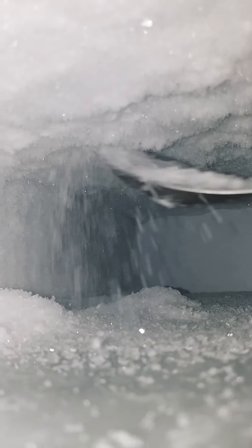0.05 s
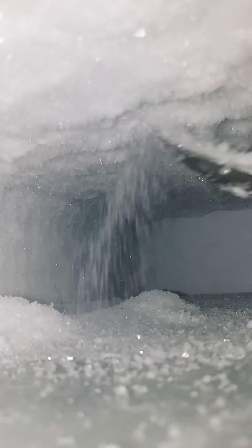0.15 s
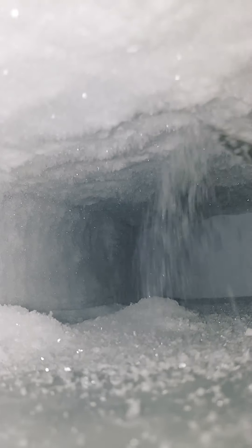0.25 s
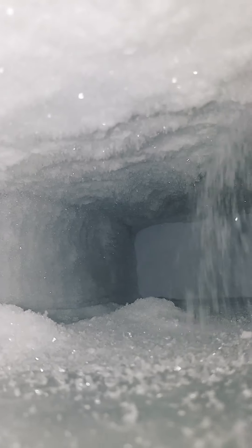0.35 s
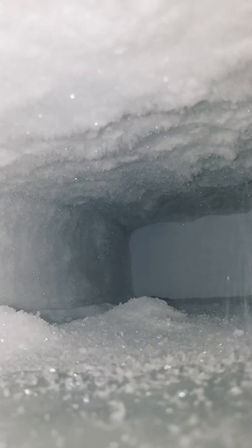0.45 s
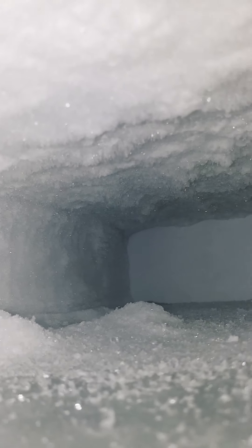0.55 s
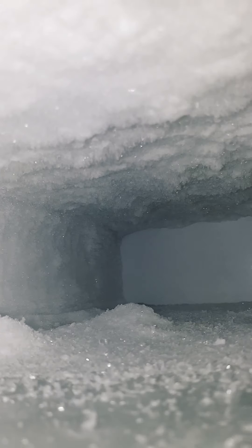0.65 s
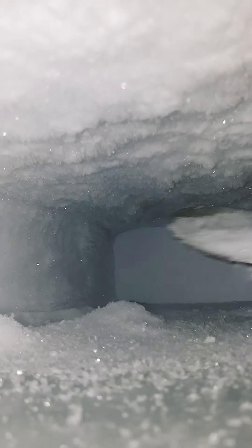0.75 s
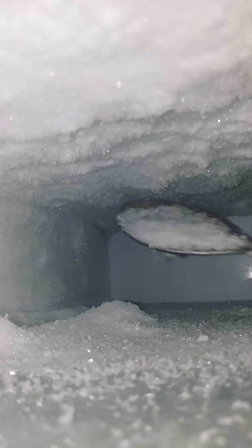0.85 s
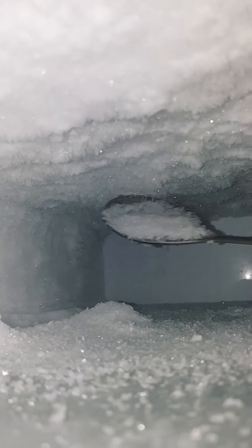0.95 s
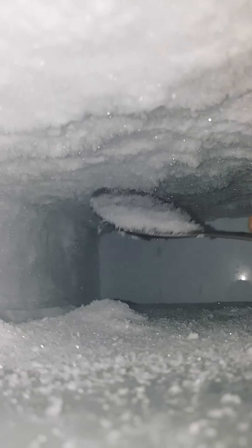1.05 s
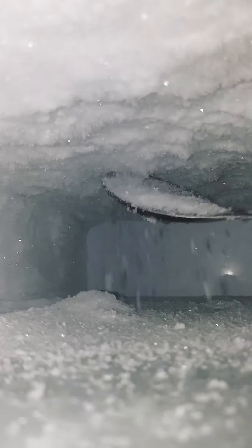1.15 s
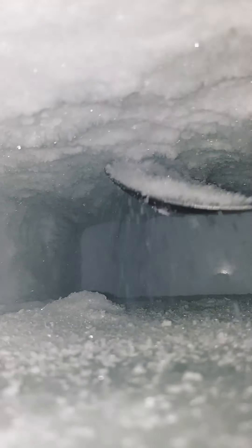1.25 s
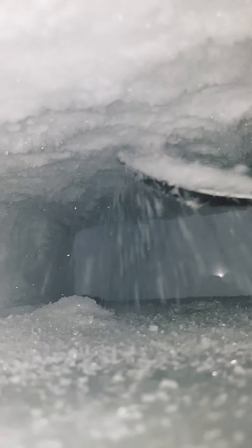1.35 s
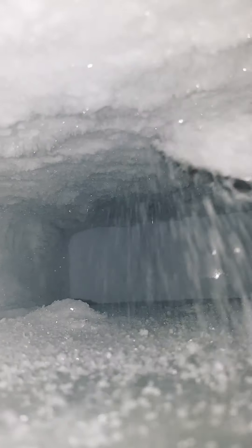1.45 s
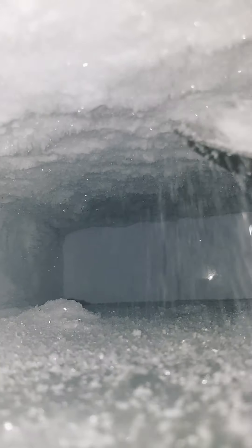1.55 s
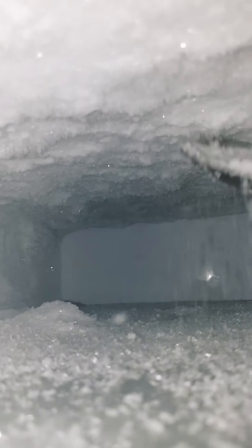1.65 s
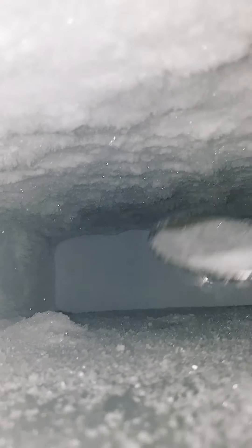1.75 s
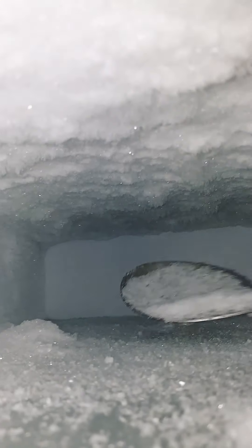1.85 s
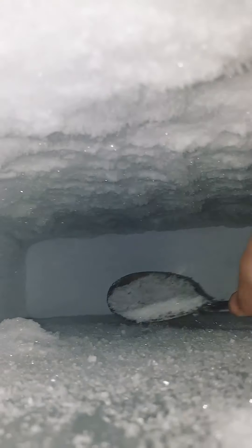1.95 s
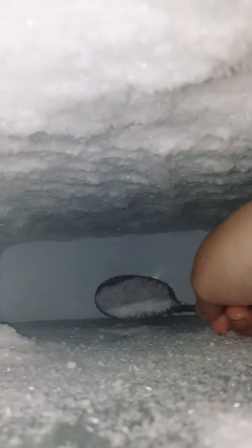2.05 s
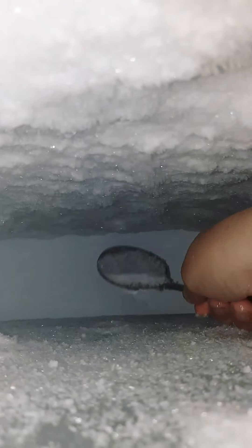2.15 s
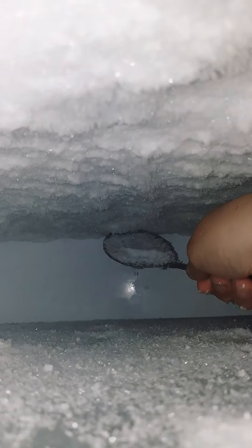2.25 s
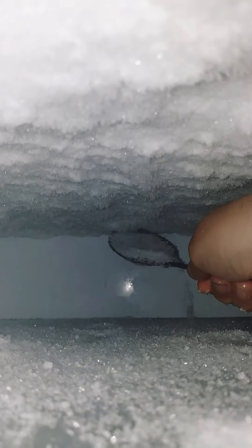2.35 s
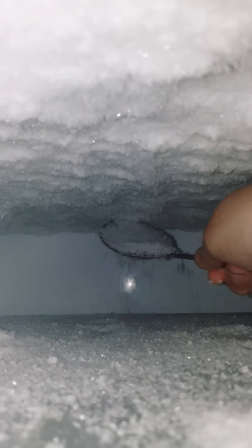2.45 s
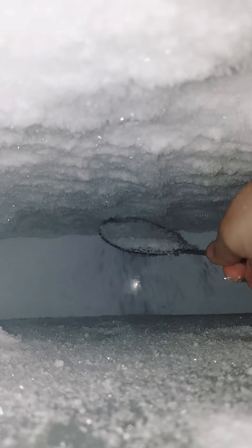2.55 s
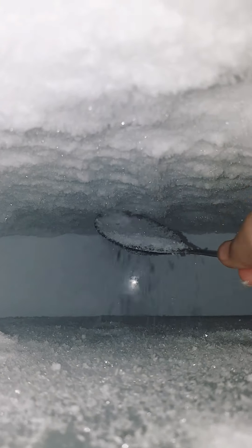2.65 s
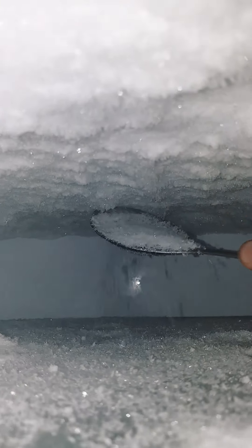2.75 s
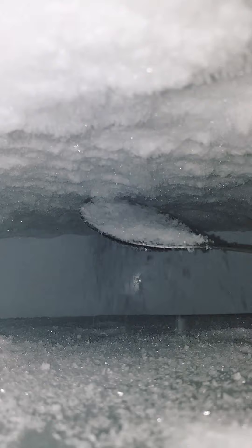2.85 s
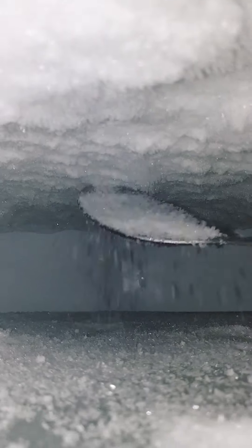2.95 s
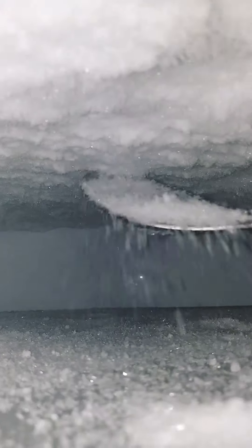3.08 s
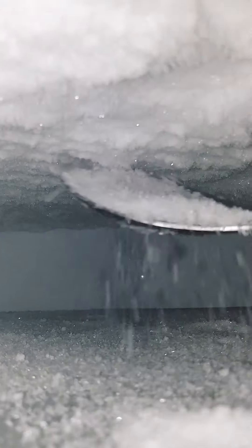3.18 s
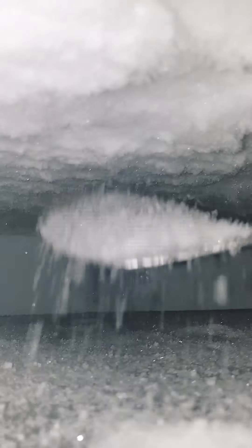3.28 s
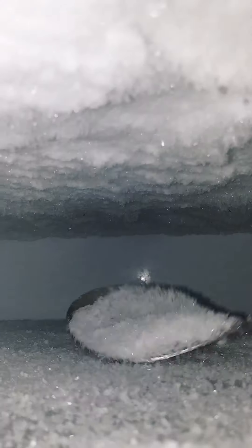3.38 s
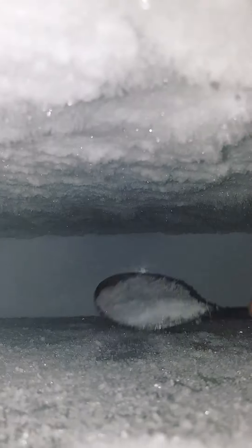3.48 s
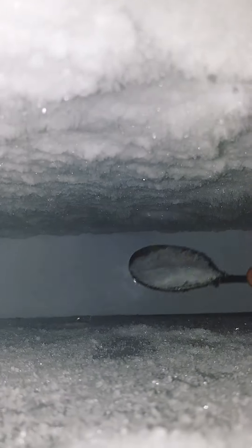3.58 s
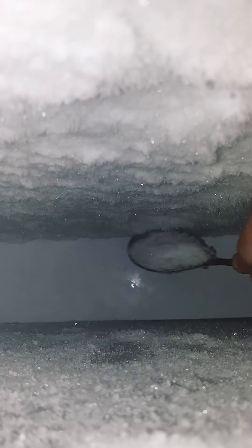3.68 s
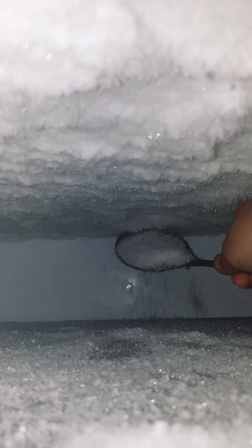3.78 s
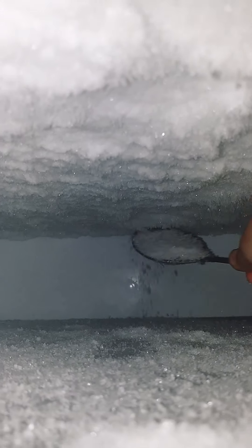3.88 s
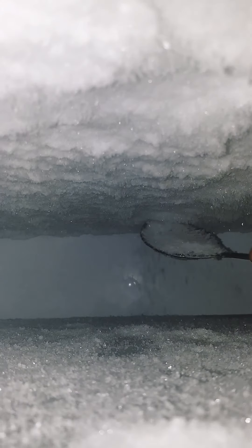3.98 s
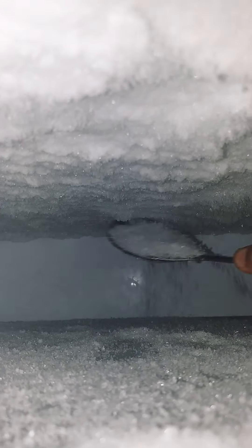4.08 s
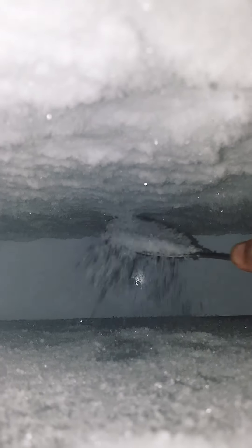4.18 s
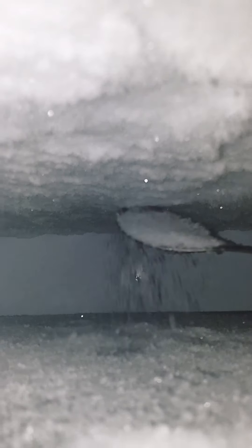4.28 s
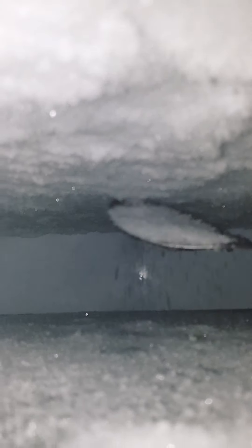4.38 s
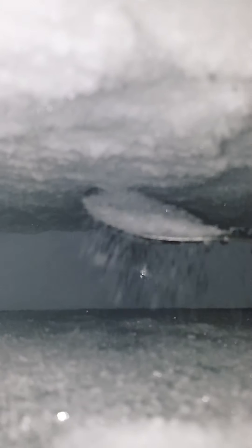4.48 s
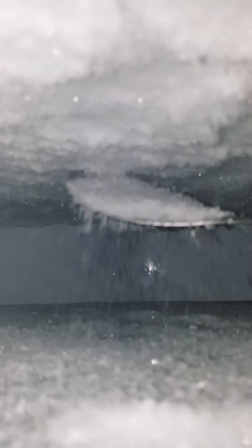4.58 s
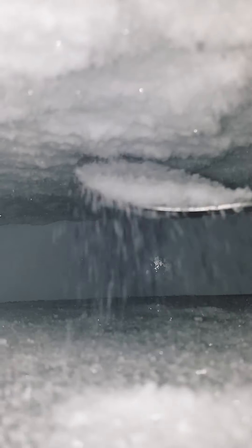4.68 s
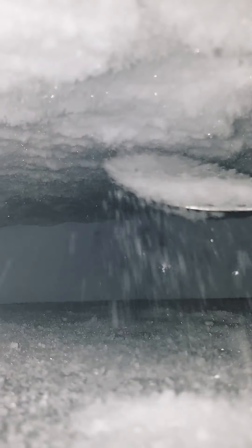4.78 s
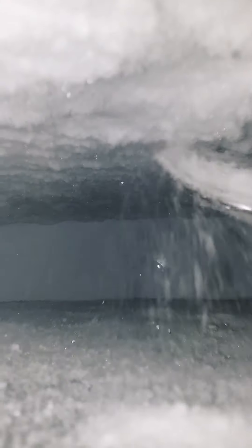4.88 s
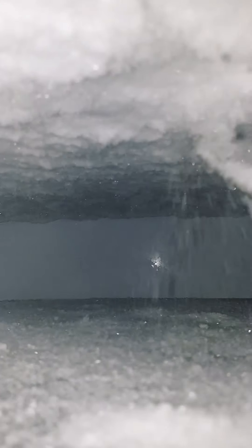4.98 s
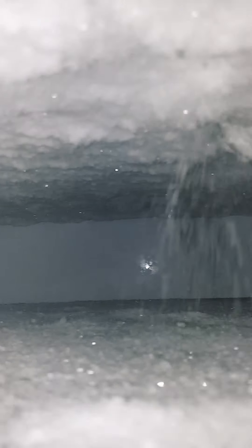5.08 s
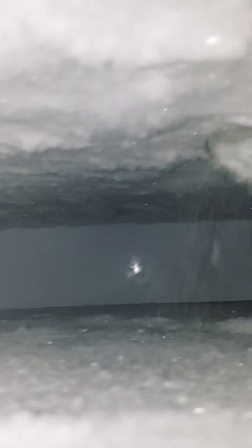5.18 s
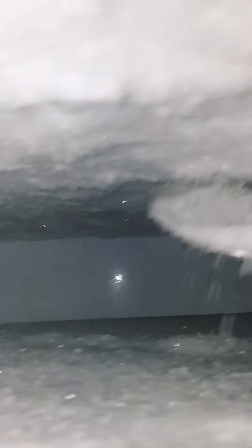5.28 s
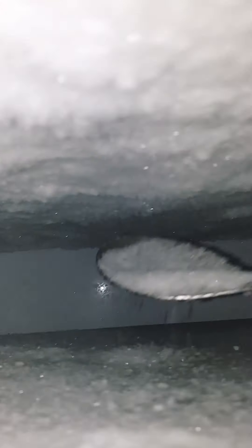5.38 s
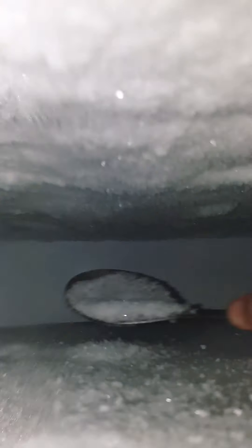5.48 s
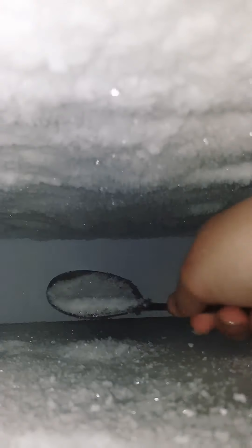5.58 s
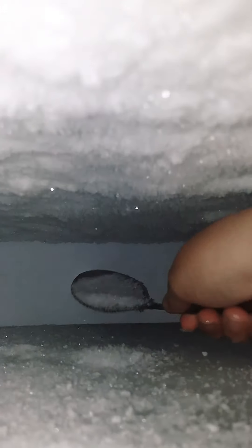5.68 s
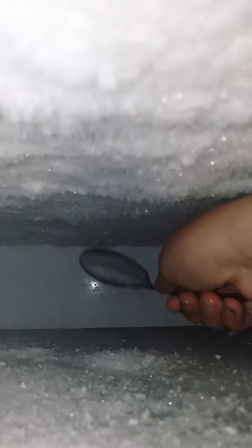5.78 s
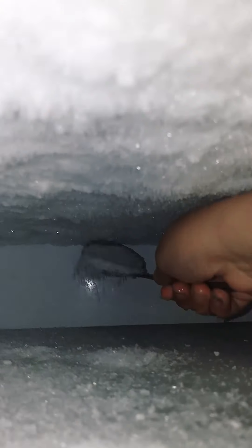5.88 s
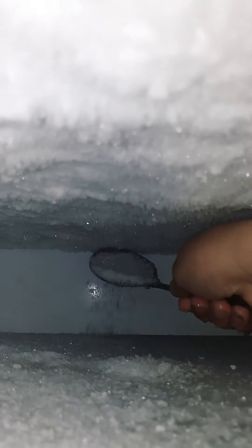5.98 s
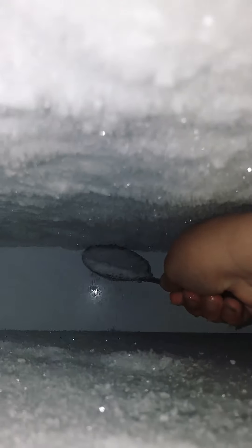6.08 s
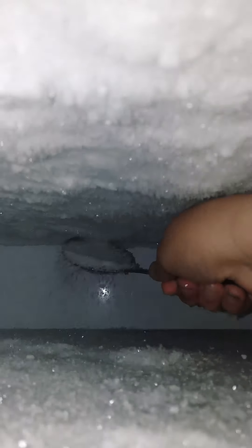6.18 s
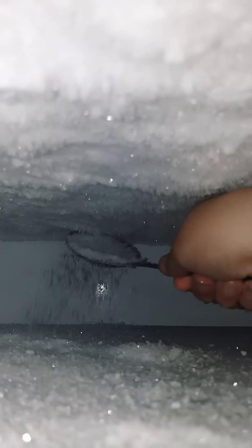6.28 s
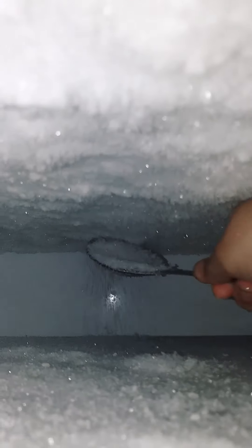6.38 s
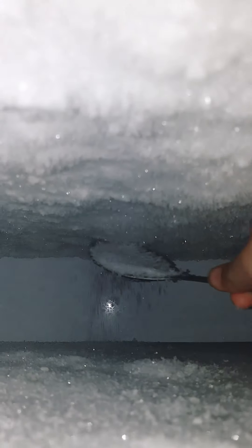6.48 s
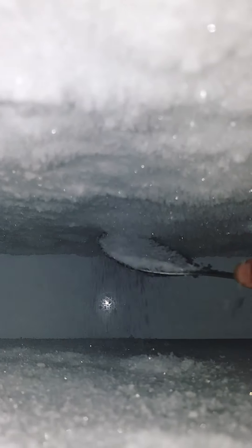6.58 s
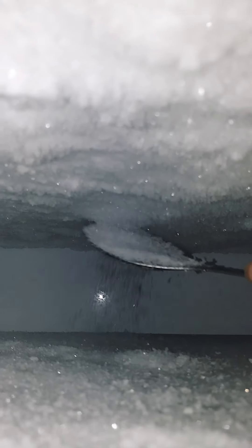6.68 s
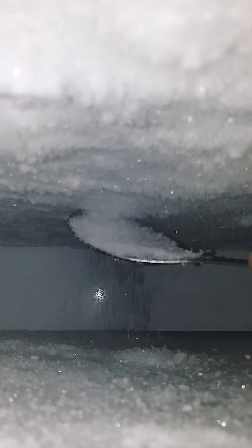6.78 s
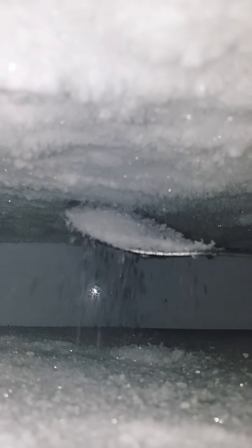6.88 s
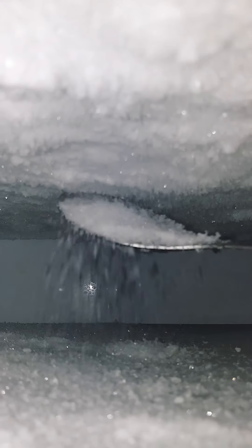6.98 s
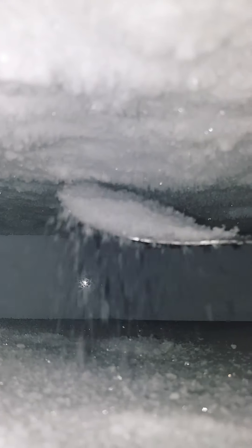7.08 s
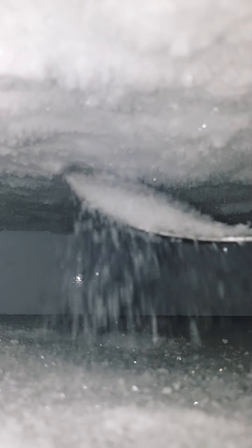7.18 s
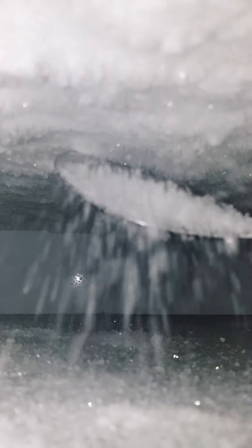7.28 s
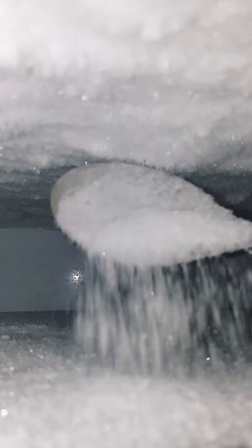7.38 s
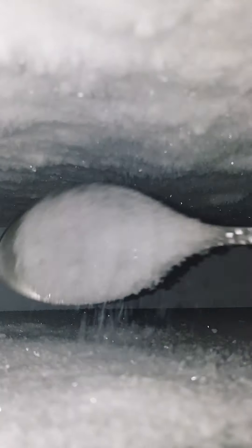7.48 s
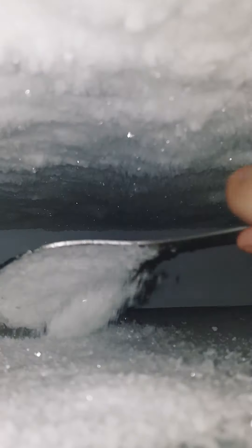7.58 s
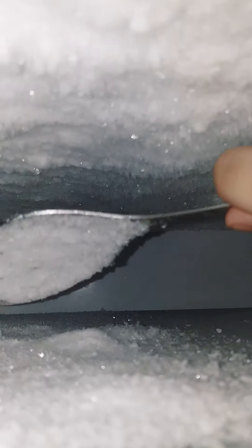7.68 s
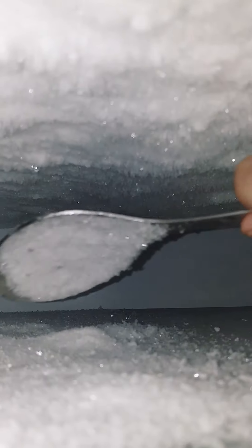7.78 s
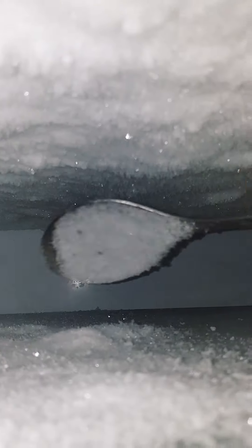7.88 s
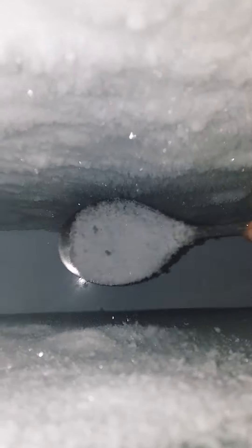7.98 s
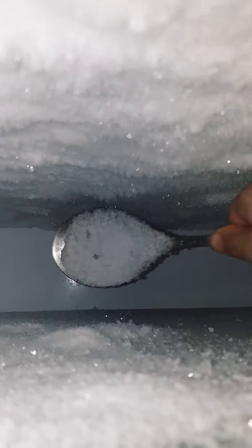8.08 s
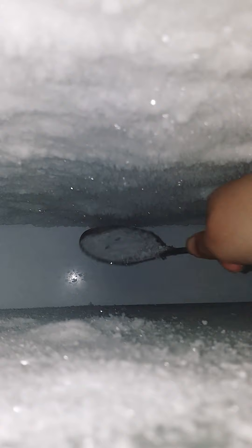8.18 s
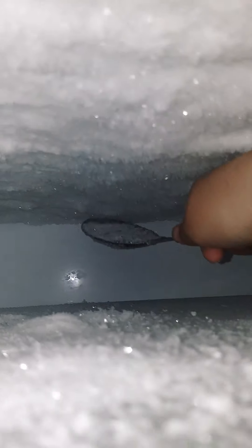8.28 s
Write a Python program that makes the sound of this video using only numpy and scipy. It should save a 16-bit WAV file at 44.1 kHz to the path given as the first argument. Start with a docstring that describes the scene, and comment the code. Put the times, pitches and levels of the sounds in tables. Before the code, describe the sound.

A metal spoon rasps through thick frost in five crunchy strokes inside a small hollow freezer, with ice crumbs ticking and one hard knock near the end.

```python
"""Inside a small freezer, a steel spoon scrapes thick frost off the roof in five strokes.
The scraping is random crystal snaps, filtered by frost, compartment and spoon, split into five bands.
Decaying crunches and sine thuds lead into every stroke but the first.
Between strokes broadband rustles and hiss swells, light drags among them, rise and fade.
A tap, clicks and a hard knock are filtered chatter plus lining ring; crumbs tick as noise plus a sine.
Filtered noise and a wavering 110 Hz sine form the background."""
import sys
import numpy as np
from scipy import signal
from scipy.fft import rfft, irfft, next_fast_len
from scipy.io import wavfile
from scipy.ndimage import map_coordinates

SR = 44100
rng = np.random.default_rng(int(sys.argv[2]) if len(sys.argv) > 2 else 0)


def waveform_to_disk(signal):
    """Save audio, clipped to [-1, 1], as 16-bit WAV at the path in sys.argv[1]."""
    frames = np.transpose(np.atleast_2d(signal))
    scaled = np.clip(frames, -1, 1) * 32767
    samples = np.round(scaled).astype(np.int16)
    wavfile.write(sys.argv[1], SR, samples)


N = 367794
TIME = np.arange(N) / SR


def amp(db):
    """Decibels to linear gain."""
    return 10 ** (np.asarray(db) / 20)


def unit(x):
    """Scale to an RMS of 1."""
    return x / np.sqrt(np.mean(x ** 2) + 1e-20)


def along(points, hz):
    """Interpolate (frequency [Hz], value) points on a log frequency axis."""
    f, v = np.transpose(points)
    return np.interp(np.log(hz + 1), np.log(f + 1), v)


def add(track, s, sound):
    """Mix a sound in at time s."""
    room = track[max(round(s * SR), 0):][:len(sound)]
    room += sound[:len(room)]


def wobble(rate, n):
    """Smooth random curve, rate knots a second."""
    knots = rng.standard_normal(int(n * rate / SR) + 4)
    return map_coordinates(knots, [np.arange(n) * rate / SR])


def colour(x, spectrum, modes):
    """Minimum-phase (causal) filter: a broad spectrum with resonances standing on it."""
    m = 2 * next_fast_len(len(x) // 2 + 4096)
    hz = np.fft.rfftfreq(m, 1 / SR)
    db = along(spectrum, hz)
    for centre_hz, width_hz, lift_db in modes:
        db = db + lift_db / (1 + (2 * (hz - centre_hz) / width_hz) ** 2)
    # folding the cepstrum gives the causal phase
    cepstrum = irfft(np.log(amp(db)))
    cepstrum[1:m // 2] *= 2
    cepstrum[m // 2 + 1:] = 0
    return irfft(rfft(x, m) * np.exp(rfft(cepstrum)))[:len(x)]


def band(x, lo_hz, hi_hz, order=8):
    """Zero-phase band-pass with Butterworth-shaped edges."""
    m = next_fast_len(len(x) + 4096)
    hz = np.fft.rfftfreq(m, 1 / SR) + 1
    low_edge = 1 + (lo_hz / hz) ** (2 * order)
    high_edge = 1 + (hz / hi_hz) ** (2 * order)
    return irfft(rfft(x, m) * (low_edge * high_edge) ** -.5, m)[:len(x)]


# background spectrum: (frequency [Hz], density [dB per Hz, relative])
BACKGROUND_SPECTRUM = [(22, -39), (36, -22.5), (52, 1.5), (76, -11), (110, -2), (190, -11), (290, -2.5),
                       (400, -8.5), (750, -17), (2500, -19.5), (4500, -23), (8000, -30.5), (11000, -35),
                       (16000, -36.5)]
HISS_DB = -51
HUSH_AT_S, HUSH_S, HUSH_DB = 7.7, 0.29, -9


def background():
    """Filtered noise that sinks near the end; a low sine wavers in phase and level."""
    hiss = unit(colour(rng.standard_normal(N), BACKGROUND_SPECTRUM, [(9700, 500, 4)]))
    hush_db = HUSH_DB * np.clip((TIME - HUSH_AT_S) / HUSH_S, 0, 1)
    hum = np.sin(2 * np.pi * 110 * TIME + wobble(9, N)) * amp(2 * wobble(5, N))
    return hiss * amp(HISS_DB + hush_db) + amp(-55.5) * unit(hum)


def fractures(n, rate, spread_db):
    """Tiny crystal snaps of random sign, rate a second, of very unequal size."""
    snaps = rng.random(n) < rate / SR
    size_db = spread_db * np.clip(rng.standard_normal(n), -2, 2)
    return unit(snaps * rng.choice([-1, 1], n) * amp(size_db))


def wander(x, patchy_db, size_hz, life_s, glide_hz_per_s, frame):
    """Upper-spectrum patches, size_hz wide, swell, sink in pitch at the glide rate and fade."""
    frames = dict(nperseg=frame, noverlap=frame * 3 // 4)
    hz, t, z = signal.stft(x, SR, **frames)
    place = (hz[:, None] + glide_hz_per_s * t) / size_hz
    age = np.broadcast_to(t / life_s, place.shape)
    grid = rng.standard_normal((int(place.max()) + 3, int(age.max()) + 3))
    field = map_coordinates(grid, [place, age], order=2)
    depth_db = np.interp(hz, [350, 1200], [0, patchy_db])[:, None]
    return signal.istft(z * amp(depth_db * field), SR, **frames)[1][:len(x)]


def fracture_stream(n):
    """The edge sticks and slips; each slip breaks a crowd of crystals."""
    slip = amp(0.59 * wobble(80, n) + 1.03 * wobble(300, n))
    snaps = slip * fractures(n, rate=7000, spread_db=3)
    # resonances glide as the contact slides along the rim
    snaps = wander(snaps, patchy_db=3.6, size_hz=105, life_s=.19, glide_hz_per_s=600, frame=1024)
    # crystals break in brief clumps of their own pitch
    return wander(snaps, patchy_db=2, size_hz=1600, life_s=.012, glide_hz_per_s=0, frame=256)


# crushed frost: (frequency [Hz], density [dB per Hz, relative])
FROST_SPECTRUM = [(30, -29), (70, -21), (110, 2.5), (205, -11), (400, -12), (900, -10.5), (1230, -19.5),
                  (1450, -12.5), (2200, -9.5), (3500, -18.5), (7000, -29), (11500, -45), (15500, -38.5)]
# compartment and spoon resonances: (frequency [Hz], width [Hz], lift [dB])
BOX_MODES = [(128.7, 25, 15), (163.8, 18.7, 12), (293.5, 79, 16.5), (413.5, 40, 11.5), (575, 116, 9),
             (689, 30, 6), (874, 6.2, 11.5), (1065, 56, 6), (1822, 160, 6.5), (9510, 1200, 5.5),
             (11700, 540, 3), (12843, 562, 5)]
# compartment peaks and dips, spoon at back / front: (frequency [Hz], width [Hz], lift [dB])
BACK_MODES = [(385, 55, 2), (690, 130, 3), (850, 130, -2.5), (1330, 230, -2.5), (2120, 200, 1.5),
              (3120, 500, -0.5)]
FRONT_MODES = [(175, 50, 2), (392.5, 62, -1.5), (480, 55, 3.5), (980, 260, 1.5), (1460, 220, 2),
               (2305, 500, -1), (10800, 1500, 1.5)]
# harder lumps, soft pockets: (time [s], extra scraping [dB], extra wall drumming [dB])
LUMPS = [(.235, 1, 4.5), (.54, 1.5, 2), (.605, 3.5, 8), (1.145, 0.5, 0), (1.52, 3, 2), (2.8, 1.5, 5),
         (3.11, 4, 4.5), (3.3, 0.5, 0), (4.185, 2, 5), (4.43, 3, 3), (4.68, 1, 2), (4.88, 2, 3),
         (5.06, -1.5, 2), (6.47, 1.5, 1), (6.9, -2.5, -1), (7.08, -0.5, 3.5), (7.175, 1, 3),
         (7.29, 1.5, 3.5)]
LUMP_S = 0.039  # from the centre of a lump to 1/e of its dB
# voice rules: (level [dB], gain over the pull [dB], mid-stroke arch [dB], drop at lift [dB], fade [dB/s])
DRUM = (1.0, 7.9, 1.8, 5.5, 93)  # hollow wall
CRUNCH = (2.5, -1, 2.5, 0.5, 112)  # packed frost giving way
RASP = (-2.23, -3.5, 1.6, 6.5, 99)  # spoon bowl
FIZZ = (-8, -1, 3.5, 7, 130.5)  # small crystals
SIZZLE = (-21, 4.5, 1, 20, 109)  # finest powder
RISE_DB = 19  # gained in one rise time as the edge sinks in
LET_GO_S, TAIL_S = 0.04, .6  # pressure easing at the lift; the compartment's ring dying away after it


def stroke(pull, spot_modes):
    """The edge sinks in, ploughs from back to front and lifts; returns start time and sound."""
    grip_s, rise_s, lift_s, level_db, gain_db, wall_db, fizz_db, sizzle_db = pull
    t = np.arange(max(grip_s - 1.3 * rise_s, -.01), lift_s + TAIL_S, 1 / SR)
    travel = np.clip((t - grip_s) / (lift_s - grip_s), 0, 1) - .5  # -.5 back, .5 front
    since_lift = np.maximum(t - lift_s, 0)
    force_db = level_db + gain_db * travel - RISE_DB * np.maximum(grip_s - t, 0) / rise_s
    lump_db, thump_db = np.zeros(len(t)), np.zeros(len(t))
    for s, scrape_db, drum_db in LUMPS:
        bump = np.exp(-((t - s) / LUMP_S) ** 2)
        lump_db += scrape_db * bump
        thump_db += drum_db * bump

    snaps = fracture_stream(len(t))
    modes = list(BOX_MODES) + list(spot_modes)
    back = colour(snaps, FROST_SPECTRUM, modes + list(BACK_MODES))
    front = colour(snaps, FROST_SPECTRUM, modes + list(FRONT_MODES))
    body = (.5 - travel) * back + (.5 + travel) * front

    def voice(rule, lo_hz, hi_hz, extra_db):
        """One band of the crushed frost follows the force by its own rule."""
        db, nearer_db, arch_db, drop_db, fade_db_per_s = rule
        release_db = drop_db * (1 - np.exp(-(since_lift / LET_GO_S) ** 3)) + fade_db_per_s * since_lift
        shape_db = db + nearer_db * travel - arch_db * (2 * travel) ** 2 - release_db
        return amp(force_db + shape_db + extra_db) * unit(band(body, lo_hz, hi_hz))

    sound = voice(DRUM, 18, 210, wall_db + thump_db)
    sound += voice(CRUNCH, 235, 1456, lump_db)
    sound += voice(RASP, 1290, 3260, lump_db)
    sound += voice(FIZZ, 3600, 9600, fizz_db + lump_db / 2)
    sound += voice(SIZZLE, 10230, 18000, sizzle_db)
    return t[0], sound * np.clip((t - t[0]) / 0.0021, 0, 1)


# pulls: (full grip [s], rise [s], lift [s], level [dB], gain over the pull [dB],
#         extra wall drumming [dB], extra fizz [dB], extra sizzle [dB])
PULLS = [(.12, .7, 0.5, -23, 1, -0.5, 2, 6.5), (1.105, 0.078, 1.614, -20.5, 1, -0.5, 1, 3.5),
         (2.47, 0.12, 3.261, -19.5, -2.2, -0.9, 0.5, -2), (3.955, .085, 5.17, -21, -2, 0, -0.5, -0.5),
         (6.19, .09, 7.35, -20, 0, -2, -2, -1)]
# roof resonances where each stroke works: (frequency [Hz], width [Hz], lift [dB])
SPOT_1_MODES = [(216, 37, 6.5), (341, 19, 8), (890, 210, 4), (1380, 230, 3.5), (1920, 350, 1),
                (2540, 610, 7), (5570, 2700, 1.5), (9960, 1600, 8.5), (11400, 460, 9), (15013, 945, 7.5)]
SPOT_2_MODES = [(102, 24, 7.4), (311, 8.8, 9.6), (896, 57, 6), (1180, 49, 4.9), (1320, 42, 4.6),
                (1704, 100, 3.2), (2490, 530, 5), (4150, 200, 4.3), (8880, 1600, 4.4)]
SPOT_3_MODES = [(315, 14, 6.8), (407, 16, 4.8), (664, 24, 8.2), (780, 13, 6.9), (2210, 870, 12.2),
                (3065, 330, 8.6), (4700, 1200, 1.8), (12119, 268, 2.8)]
SPOT_4_MODES = [(161, 14, 4.7), (260, 90, 2.5), (436, 32, 5), (1090, 63, 1.8), (2280, 65, 8.2),
                (4200, 110, 4), (4800, 620, 2.6), (6900, 630, 4.1)]
SPOT_5_MODES = [(263.5, 56, 5.4), (472, 32, 9.4), (614, 33, 14.1), (760, 36, 10), (2020, 303, 4.3),
                (3350, 900, 3.7), (4650, 330, 7.1), (7140, 292, 4.6)]


def scraping():
    """Five strokes, each exciting the resonances of another spot of the roof."""
    out = np.zeros(N)
    spots = [SPOT_1_MODES, SPOT_2_MODES, SPOT_3_MODES, SPOT_4_MODES, SPOT_5_MODES]
    for pull, spot_modes in zip(PULLS, spots):
        add(out, *stroke(pull, spot_modes))
    return out


# largest ice crumbs landing: (time [s], level [dB, relative])
CRUMBS = [(1.9225, -34), (2.0033, -36), (5.2669, -33), (7.4096, -32), (7.5348, -22), (7.58, -32.5),
          (7.74, -21.5), (7.7812, -38), (7.8131, -31)]
SPILL_DB, SPILL_SPREAD_DB, SPILL_S = -42, -7, .55  # smaller crumbs after each lift


def crumbs(ring_hz=7600):
    """Ice grains tick as a bright noise crack plus a short ring; five small ones spill after each pull."""
    out, t = np.zeros(N), np.arange(SR // 30) / SR
    landings = list(CRUMBS)
    for pull in PULLS:
        lift_s = pull[2]
        for when, weight in rng.random(size=(5, 2)):
            landings.append((lift_s + SPILL_S * when, SPILL_DB + SPILL_SPREAD_DB * (2 * weight - 1)))
    for s, db in landings:
        crack = unit(band(rng.standard_normal(len(t)), 7500, 18000, order=3))
        crack *= amp(-7 - 60 * t / 0.011)
        ring = np.sin(2 * np.pi * ring_hz * t) * amp(-9.5 - 60 * t / 0.014)
        add(out, s, amp(db) * (crack + ring))
    return out


# broadband rustles and hiss swells, light drags among them:
# (time [s], level [dB], swell [s per 20 dB], fade [s per 20 dB], low rumble [dB], fizz [dB])
RUSTLES = [(.83, -53.5, .15, .1, 13.5, -17), (2.085, -38.5, 0.072, 0.1, -8, -6),
           (5.33, -43, 0.11, 0.18, 1, -7.5), (5.63, -53.5, 0.044, 0.35, -7, 3),
           (5.75, -47, 0.1, .2, -3.5, -7), (6.04, -37, 0.14, .12, -9, -12.5),
           (8.33, -58, 0.14, .1, -3, -11)]


def rustles(mid_db=1.0, upper_db=-3.0):
    """Bands of one filtered snap stream swell and fade exponentially between the strokes."""
    body = colour(fracture_stream(N), FROST_SPECTRUM, list(BOX_MODES) + list(FRONT_MODES))
    middle = amp(mid_db) * unit(band(body, 210, 1120)) + amp(upper_db) * unit(band(body, 1300, 3200))
    rumble = unit(band(body, 21, 240))
    fizz = unit(band(body, 3600, 18000))
    out = np.zeros(N)
    for s, db, swell_s, fade_s, rumble_db, fizz_db in RUSTLES:
        level_db = db - 20 * np.maximum((s - TIME) / swell_s, (TIME - s) / fade_s)
        out += amp(level_db) * (middle + amp(rumble_db) * rumble + amp(fizz_db) * fizz)
    return out


# compartment decay: (frequency [Hz], T60 [s])
CAVITY_T60 = [(100, 0.52), (280, 0.44), (700, 0.42), (2000, 0.39), (3000, .48), (4000, 0.47), (9000, 0.22),
              (15000, 0.13)]


def cavity(x):
    """The compartment rings on as decaying noise, longest in its low resonances."""
    hz, t, z = signal.stft(rng.standard_normal(SR * 3 // 4), SR, nperseg=256)
    decay = amp(-60 * t / along(CAVITY_T60, hz)[:, None])
    tail = signal.istft(z * decay, SR, nperseg=256)[1]
    return signal.fftconvolve(x, tail / np.linalg.norm(tail))[:len(x)]


# edge biting into the crust: (time [s], crunch [dB, relative], thud [dB, relative], crunch T60 [s])
BITES = [(.984, -6, -18.5, 0.093), (1.023, -13, -15, 0.26), (2.305, -4, -12, 0.059), (3.747, -2.5, -4, .1),
         (3.8, -10, -20, 0.15), (3.889, -17, -20, 0.055), (3.919, -4.5, -16, .08), (3.961, -6, -27, .06),
         (5.898, -1, -14.5, 0.093), (5.945, -11.5, -25, .2), (5.988, -15.5, -29, 0.29),
         (6.089, -1.5, -14, 0.041), (6.123, -11, -29, .05), (6.155, -7.5, -32, 0.084)]
BITE_RISE_S, BITE_RING_HZ = .011, 1980
BOOM_HZ, BOOM_DB, BOOM_T60_S = 150.3, -6.5, 0.14  # whole wall giving; dB relative to thud column


def bites(ring_width_hz=300, ring_db=6, thud_hz=295, thud_t60_s=0.13, thud_lag_s=0.00304):
    """The crust gives way in a short crunch; a moment later the wall behind it thuds and booms."""
    out, t = np.zeros(N), np.arange(SR // 3) / SR
    modes = list(BOX_MODES) + [(BITE_RING_HZ, ring_width_hz, ring_db)]
    age = t - BITE_RISE_S
    for s, db, thud_db, t60_s in BITES:
        crust = colour(fractures(len(t), rate=5300, spread_db=4.5), FROST_SPECTRUM, modes)
        swell_db = np.minimum(28 * age / BITE_RISE_S, -60 * age / t60_s)
        crust = unit(band(crust, 300, 18000, order=2)) * amp(db - 10 + swell_db)
        add(out, s + .001 - BITE_RISE_S, crust)
        thud = np.sin(2 * np.pi * thud_hz * rng.normal(1, 0.032) * t) * (1 - np.exp(-t / 0.0035))
        thud *= amp(thud_db + 1.5 - 60 * t / thud_t60_s)
        boom = np.sin(2 * np.pi * BOOM_HZ * t) * (1 - np.exp(-t / .006))
        boom *= amp(thud_db + BOOM_DB - 60 * t / BOOM_T60_S)
        add(out, s + thud_lag_s, thud + boom)
    return out + amp(-10) * cavity(out)


# lining after-ring spectrum: (frequency [Hz], density [dB per Hz, relative])
LINING_SPECTRUM = [(35, -12.5), (75, -19.5), (200, -17.5), (300, -2.5), (550, -10.5), (900, -5), (1300, -7),
                   (2500, -12), (4000, -21), (5300, -16.5), (7000, -31), (12000, -31)]
# lining resonances: (frequency [Hz], width [Hz], lift [dB])
LINING_MODES = [(46, 16, 4), (110, 25, 7), (278.3, 35, 18.5), (450, 58, 9), (593, 40, 11), (940, 41, 8),
                (2080, 73, 5.5), (3000, 270, 10)]


def blow(spectrum, modes, db, contact_t60_s, ring_db):
    """Steel chatters briefly on plastic; the compartment lining rings on."""
    t = np.arange(SR * 3 // 4) / SR
    chatter = rng.choice([-1, 1], len(t)) * amp(-60 * t / contact_t60_s)
    direct = colour(chatter, spectrum, modes)
    ring = colour(cavity(signal.unit_impulse(len(t))), LINING_SPECTRUM, LINING_MODES)
    sound = direct / np.linalg.norm(direct) + amp(ring_db) * ring / np.linalg.norm(ring)
    return amp(db) * np.sqrt(SR // 100) * sound  # db: RMS of the direct energy packed into 10 ms


# compartment and spoon singing on: (frequency [Hz], phase wander [knots/s], level [dB], T60 [s])
AFTER_RING = [(294, 4, -24, 0.55), (612, 15, -30, .45), (880, 40, -28.5, .42), (2940, 300, -43.5, .7),
              (5300, 200, -64, 1.6)]


def after_ring():
    """Phase-wandering cosines, like clusters of close resonances, die away slowly."""
    t = np.arange(SR * 3 // 4) / SR
    out = np.zeros(len(t))
    for hz, wander_rate, db, t60_s in AFTER_RING:
        cluster = np.cos(2 * np.pi * hz * t + 2 * wobble(wander_rate, len(t)))
        out += unit(cluster) * amp(db - 60 * t / t60_s)
    return out * (1 - np.exp(-t / .006))


# plastic lining under a light tap, a dry click, a hard knock
# spectra: (frequency [Hz], density [dB per Hz, relative]); modes: (frequency [Hz], width [Hz], lift [dB])
TAP_SPECTRUM = [(35, -17), (220, 9), (330, -8), (600, 3), (900, -16), (2200, 1), (3400, -17), (5500, -16),
                (10000, -24), (15500, -29.5)]
TAP_MODES = [(490, 47, 10), (1367, 28, 19.6), (1540, 140, 7), (2910, 530, 7), (4150, 380, 16),
             (4860, 220, 11), (7250, 200, 11), (9200, 900, 8.3)]
CLICK_SPECTRUM = [(35, -11), (110, -8), (240, 0), (500, -13), (850, -14), (1150, -2.5), (2200, -1),
                  (2800, -4), (4500, -25), (8000, -33), (15500, -45)]
CLICK_MODES = [(5500, 350, 5.3), (9500, 1300, 13)]
KNOCK_SPECTRUM = [(35, -24), (150, -19), (270, 4.5), (480, -15.5), (750, -3.5), (1350, -7.5), (2600, -3.5),
                  (3600, -8), (6000, -12), (10000, -23), (15500, -35)]
KNOCK_MODES = [(890, 260, 7), (2030, 92, 13), (2950, 280, 13), (2270, 360, 3.4), (4160, 300, 6),
               (7700, 200, 6.8)]
# dry spoon clicks: (time [s], level [dB])
CLICKS = [(5.325, -30), (5.343, -32), (5.581, -20.5)]


def knocks():
    """A tap that also sways the cabinet at 48 Hz, dry clicks, and a hard knock of the full spoon."""
    out, t = np.zeros(N), np.arange(SR // 2) / SR
    add(out, 3.4722, blow(TAP_SPECTRUM, TAP_MODES, db=-17, contact_t60_s=0.025, ring_db=-7.5))
    sway = np.sin(2 * np.pi * 48 * t) * (1 - np.exp(-t / .015)) * amp(-37 - 60 * t / .5)
    add(out, 3.475, sway)
    for s, db in CLICKS:
        add(out, s, blow(CLICK_SPECTRUM, CLICK_MODES, db, contact_t60_s=0.017, ring_db=-25))
    add(out, 7.6408, blow(KNOCK_SPECTRUM, KNOCK_MODES, db=-5.5, contact_t60_s=0.041, ring_db=-7.5))
    add(out, 7.645, after_ring())
    return out


def scene():
    """Sum of all layers, one channel."""
    return (background() + scraping() + crumbs() + rustles() + bites() + knocks())[None]


TOP_HZ = 15850


def record(dry):
    """Peaks flatten smoothly towards full scale; a steep low-pass then cuts at TOP_HZ."""
    clipped = dry / (1 + np.abs(dry) ** 6) ** (1 / 6)
    return irfft(rfft(clipped) * (np.fft.rfftfreq(N, 1 / SR) < TOP_HZ), N)


dry = scene()
out = record(dry)
waveform_to_disk(out)
```